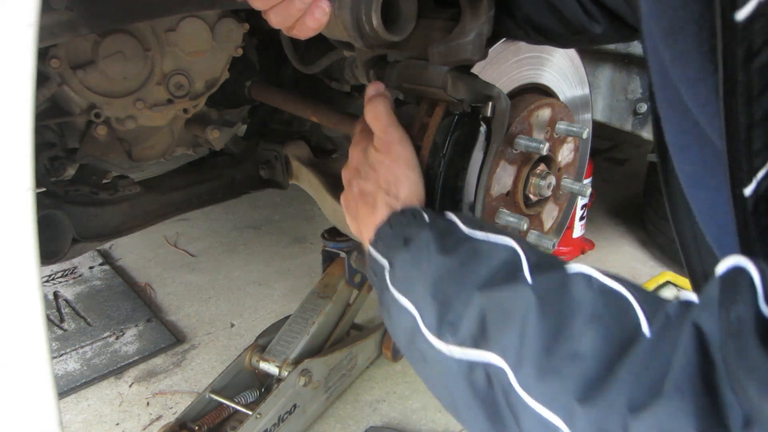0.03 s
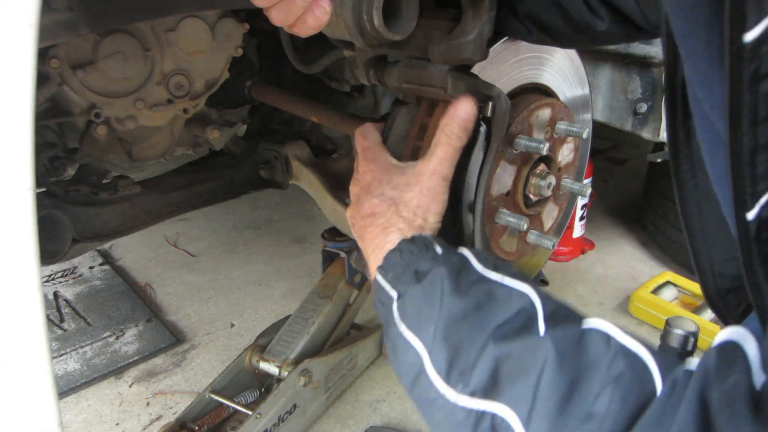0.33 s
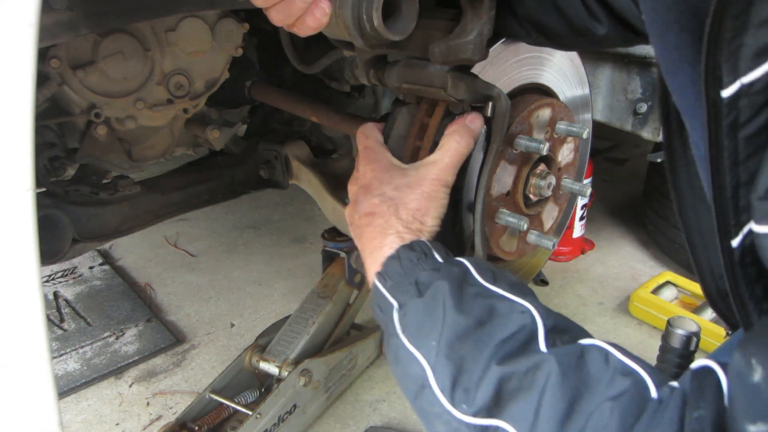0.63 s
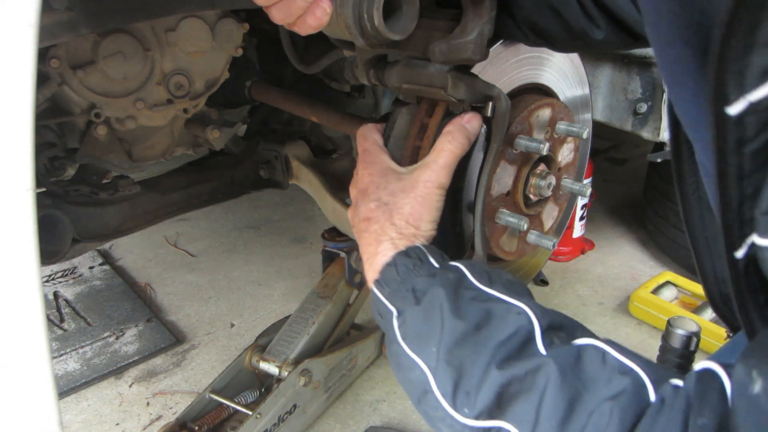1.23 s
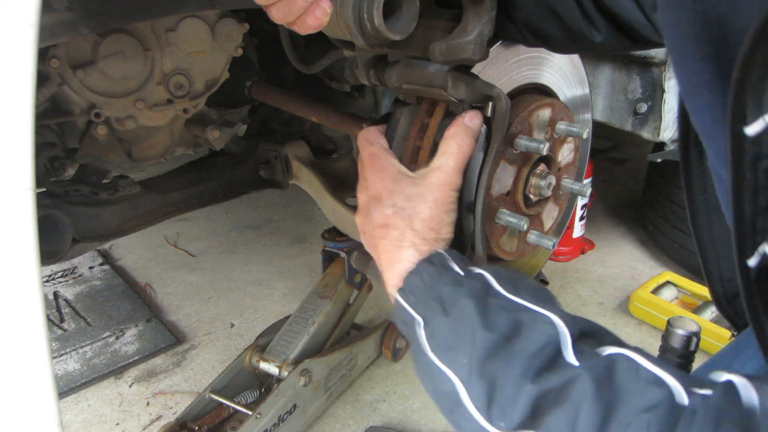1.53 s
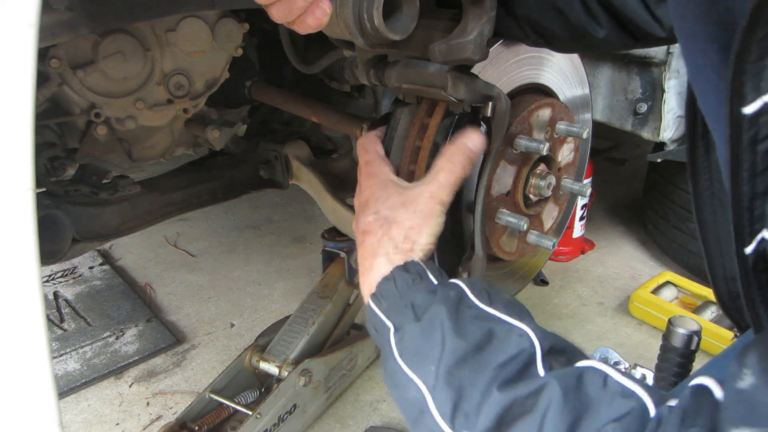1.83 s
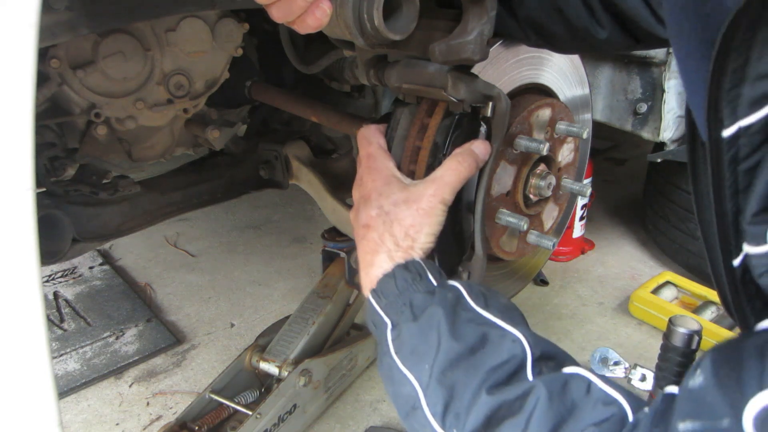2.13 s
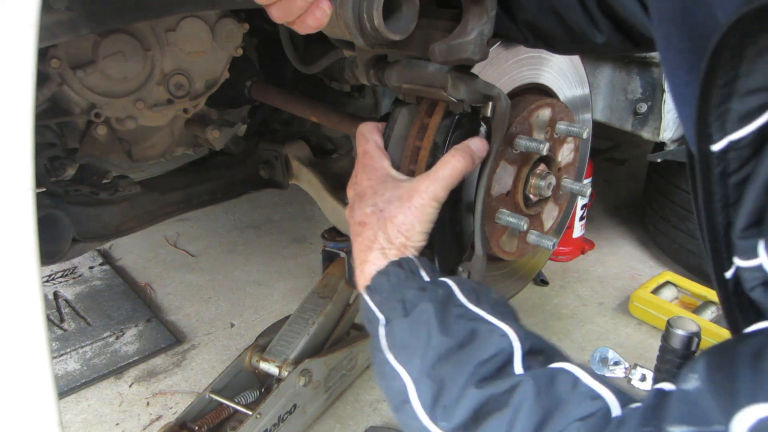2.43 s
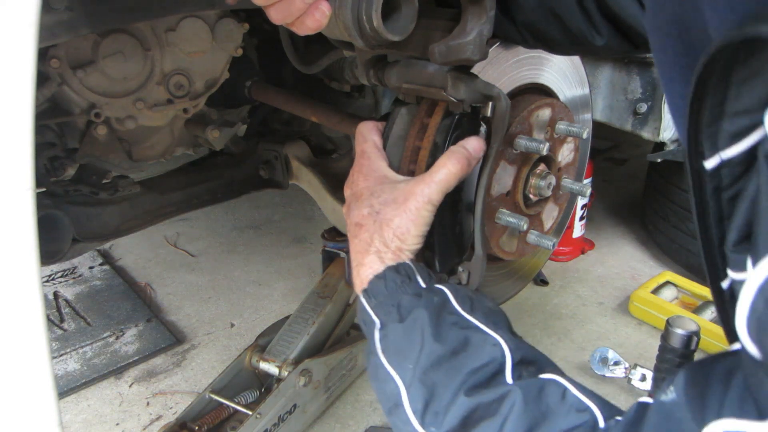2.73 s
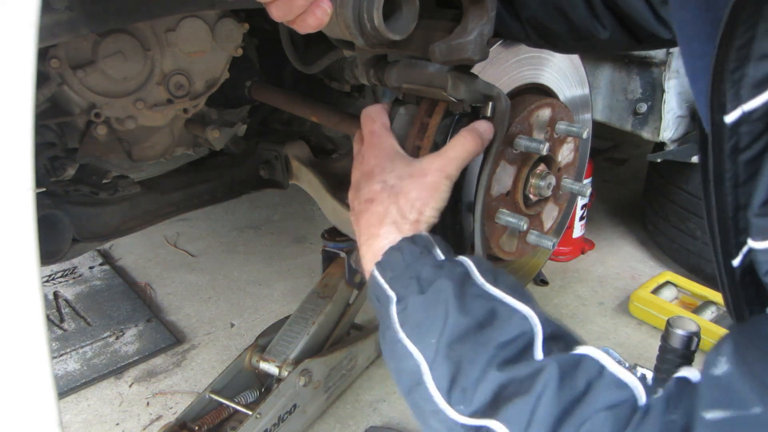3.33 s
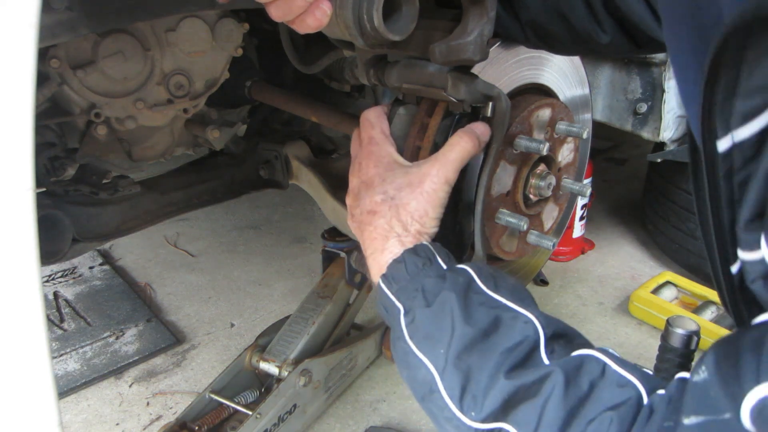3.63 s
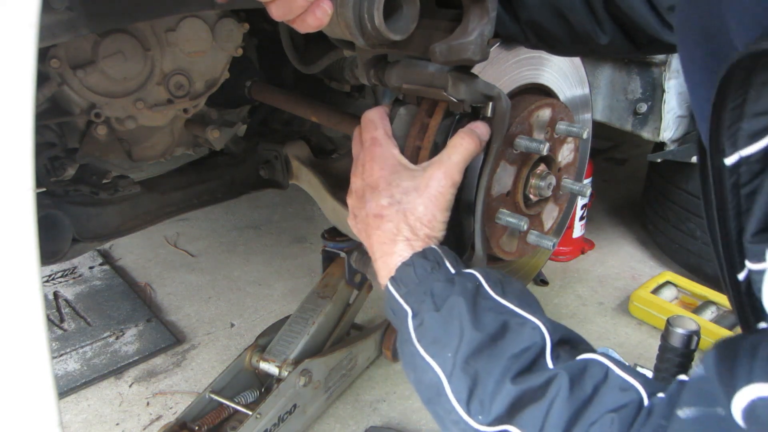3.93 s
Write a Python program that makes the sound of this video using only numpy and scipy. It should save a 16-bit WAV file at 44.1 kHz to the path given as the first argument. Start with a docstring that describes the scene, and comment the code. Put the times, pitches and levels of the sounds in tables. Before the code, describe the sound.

A metal brake caliper is rocked by hand, opening with a scrape, short squeaks and soft bumps. More high squeaks come around 1 second, then a knock just after. Scattered squeaks and bumps follow between 1.6 and 2.5 seconds. Scrapes and thuds return after 3 seconds, with a second knock near 3.5. Throughout, grit ticks faintly and a sleeve rubs on and off over low outdoor rumble.

```python
"""A hand rocks a brake caliper (the clamp that holds the pads) beside a bare wheel hub under a car.
First a pad scrapes, and dry metal sticks and slips in short rising squeaks, with soft bumps.
After about a second the caliper knocks against a stop. Scattered squeaks and bumps follow,
then more scrapes and a second knock near 3.5 s. All along, grit ticks and a sleeve rubs on and off,
and the wheel arch rings briefly over a low outdoor rumble."""
import sys
import numpy as np
from scipy import signal
from scipy.fft import rfft, irfft
from scipy.io import wavfile

SR = 44100
rng = np.random.default_rng(int(sys.argv[2]) if len(sys.argv) > 2 else 0)


def generate_wav(sig):
    """Save sig (samples, or channels by samples) to the path in sys.argv[1] as 16-bit PCM at SR."""
    pcm = np.round(np.clip(np.atleast_2d(sig).T, -1, 1) * 32767).astype(np.int16)
    wavfile.write(sys.argv[1], SR, pcm)


N = 176400


def squeaks():
    """Dry metal sticks and slips so fast that it sings; the pitch rises as the part speeds up."""
    # start_s, length_s, pitch_hz, rise (share of pitch), roughness (0-1), harmonics 1 to 4 (each in dB)
    squeak_events = [ (0.1305, 0.0055, 2820, 0.025, 0.77, -28.5, -48, -27, -56),
                     (0.135, 0.013, 2660, 0.019, .8, -44.5, -69, -64, -76),
                     (0.198, 0.021, 2100, 0.012, 0.3, -63, -53, -56, -63),
                     (0.861, 0.014, 2260, 0.017, .3, -60, -55, -71, -80),
                     (0.866, 0.03, 5340, 0.053, 0.77, -46, -53, -85, -90),
                     (0.971, 0.029, 2294, 0.027, 0.3, -56, -52, -57, -63),
                     (1.005, 0.011, 3292, 0.011, 0.25, -26, -36, -43.5, -57),
                     (1.015, 0.0077, 3405, 0.021, 0.53, -32.5, -33.5, -37, -49),
                     (1.599, 0.017, 5440, 0.0037, 0.32, -34.5, -31, -70, -90),
                     (1.612, 0.012, 5720, 0.017, 0.35, -29, -51, -75, -90),
                     (1.812, 0.0082, 3350, .02, .3, -75, -57, -57, -80),
                     (2.473, 0.0306, 3306, 0.0324, 0.13, -33.5, -40, -46, -62),
                     (2.497, 0.031, 3458, 0.0043, 0.14, -43.5, -44, -54, -64),
                     (3.18, 0.0039, 2300, 0.011, 0.5, -33.5, -34.5, -29, -26),
                     (3.184, 0.013, 2414, .01, 0.65, -42.5, -59, -52, -46),
                     (3.45, 0.0099, 4390, .01, 0.5, -56, -43.5, -75, -88), ]
    attack_s, release_s = 0.0096, 0.0098
    out, t = np.zeros(N), np.arange(N // 32) / SR
    for start, length, hz, rise, rough, *harmonics_db in squeak_events:
        speed = 1 - (1 - np.minimum(t / length, 1)) ** 1.37
        pitch = hz * (1 + rise * speed) * (1 + 0.045 * rough * wander(len(t), hz=900))
        phase = 2 * np.pi * np.cumsum(pitch) / SR
        tone = sum(gain(db) * np.sin(k * phase)
                   for k, db in enumerate(harmonics_db, 1) if k * hz < SR / 2)
        hiss = tone.std() * rough * gain(-10) * band_noise(len(t), hz=6500, width=2.3)
        flutter = gain(2.5 * rough * wander(len(t), hz=240))
        envelope = np.minimum(t / attack_s, 1) * np.clip((length - t) / release_s + .5, 0, 1)
        add(out, start, envelope * (tone * flutter + hiss))
    return out


def knocks():
    """The caliper clacks on a stop, rings, rattles nearby parts and drops back with a duller blow."""
    # Hits: start_s, level_db, clack_hz, clack_db, brightness_hz, rebound_delay_s, rebound_db
    hits = [(1.1487, -23, 1400, 3.5, 1780, .018, -23), (3.4528, -25, 1040, 4.5, 1620, 0.0166, -8)]
    # The notes the caliper rings with: pitch_hz, level_db, fade_s (time to fall 60 dB)
    caliper_notes = [(329.5, -14.5, 0.18), (453.6, -8, .13), (656, -17.5, 0.097), (848, -6, 0.08),
                     (1020, -45, 0.028), (1076, -11, 0.17), (1133, 0, 0.042), (1356, -7.5, 0.047),
                     (1500, -1.5, 0.019), (2520, -20, 0.12), (2900, -17, 0.07)]
    # Tone of the rattling parts: frequency_hz, relative_db
    rattle_shape = [(100, -24), (300, 10.5), (600, 12.5), (1200, 6), (1600, -14), (2200, -5), (4000, -3),
                    (9000, 14), (15000, -7)]
    contact_s, build_cycles = .0006, 4.3
    out, t = np.zeros(N), np.arange(N // 10) / SR
    push = np.sin(np.pi / 2 * np.minimum(t / contact_s, 1)) ** 2
    for start, db, clack_hz, clack_db, brightness_hz, delay, rebound_db in hits:
        ring = sum(fade(t, note_db, fade_s) * sine(t, hz) * np.minimum(t * hz / build_cycles, 1)
                   for hz, note_db, fade_s in caliper_notes)
        rattle = colour(rng.standard_normal(len(t)), rattle_shape) * fade(t, db=0.5, fade_s=0.18)
        clack = sine(t, clack_hz) * fade(t, clack_db, fade_s=0.014)
        add(out, start, gain(db) * soften(push * (rattle + ring + clack), brightness_hz))
        add(out, start + delay, gain(db + rebound_db) * soften(push * ring, hz=800))
    return out


def bumps():
    """The loose caliper thuds softly in its rubber boots as the slack runs out."""
    # Thuds: start_s, level_db, pitch_hz, fade_s
    thuds = [(0.1238, -21.5, 320, 0.015), (.134, -40, 280, 0.17), (0.156, -37, 211, 0.098),
             (1.853, -39.5, 296, .16), (2.460, -35, 267, 0.11), (3.1997, -37.5, 595, 0.099),
             (3.207, -31.5, 295, 0.11), (3.295, -42, 334, 0.19), (3.363, -45, 380, 0.16)]
    attack_s = 0.0013
    out, t = np.zeros(N), np.arange(N // 10) / SR
    for start, db, hz, fade_s in thuds:
        body = gain(-2) * sine(t, hz) + gain(-4) * band_noise(len(t), hz, width=1.03)
        add(out, start, body * np.minimum(t / attack_s, 1) * fade(t, db, fade_s))
    return out


def ticks():
    """Rust and grit snap between the sliding faces."""
    # Snaps: start_s, level_db, pitch_hz, fade_s
    snaps = [(0.636, -53.5, 7250, 0.047), (0.7136, -54, 5560, 0.0075), (1.352, -60, 7000, 0.011),
             (1.575, -58, 5000, 0.015), (1.582, -51.5, 4900, 0.041), (1.7561, -51, 5560, 0.011),
             (2.111, -52, 13000, .035), (2.574, -54, 7800, 0.019), (3.2264, -41, 6000, .018),
             (3.262, -49, 4500, 0.011), (3.298, -53, 2740, .06), (3.317, -59, 2640, 0.045),
             (3.453, -39, 6100, 0.037), (3.5064, -49.5, 5300, 0.015), (3.849, -55.5, 5750, 0.011)]
    out, t = np.zeros(N), np.arange(N // 32) / SR
    for start, db, hz, fade_s in snaps:
        add(out, start, band_noise(len(t), hz, width=0.55) * fade(t, db, fade_s))
    return out


def rubbing():
    """A sleeve and hand slide: a fluttering hiss full of tiny catches."""
    # How loud the rubbing is: time_s, level_db
    rub_levels = [(0, -61), (.09, -50), (.15, -57), (.185, -46), (.225, -49.5), (.27, -56.5), (.42, -55.5),
                  (.62, -56), (.7, -58.5), (.85, -59.5), (1.1, -87), (1.3, -58), (1.42, -86), (1.55, -64.5),
                  (1.61, -49), (1.72, -72.5), (1.88, -53.5), (2.1, -60), (2.35, -74), (2.8, -63),
                  (2.91, -58), (3.03, -61.5), (3.1, -51.5), (3.19, -55.5), (3.25, -52.5), (3.33, -52),
                  (3.39, -53), (3.44, -62), (3.6, -63), (3.75, -64), (4, -65)]
    # Tone of the rubbing: frequency_hz, relative_db
    rub_shape = [(100, 15), (300, 7), (1000, 9), (1600, 3.5), (2500, -2.5), (3500, -8.5), (6500, -7),
                 (9500, -13.5), (11500, -15), (13500, -17), (16000, -23)]
    catches_per_s = 1100
    catches = (rng.random(N) < catches_per_s / SR) * rng.standard_normal(N)
    catches *= gain(2 * np.minimum(rng.exponential(size=N), 5))  # a few stand out
    hiss = colour(rng.standard_normal(N) + gain(-3) * unit(catches), rub_shape)
    level_db = np.interp(np.arange(N) / SR, *np.array(rub_levels).T)
    return hiss * gain(level_db + 3 * wander(N, hz=37.7))


def scrapes():
    """The pad slides along its rusty bracket, catching unevenly and ringing without a clear note."""
    # Slides: start_s, length_s, level_db
    slides = [(0.069, 0.14, -58), (3.067, 0.068, -58.5), (3.198, .16, -52.5)]
    # Where the pad rings: centre_hz, width (share of centre), relative_db
    pad_bands = [(700, 0.39, 3.5), (2740, 0.21, -1), (4530, 0.17, -8), (6270, .12, -7), (7920, 0.092, -9)]
    out, t = np.zeros(N), np.arange(N // 8) / SR
    for start, length, db in slides:
        body = unit(sum(gain(band_db) * band_noise(len(t), hz, width)
                        for hz, width, band_db in pad_bands))
        stroke = np.sin(np.pi * np.minimum(t / length, 1))
        add(out, start, body * stroke * gain(db + 3.5 * wander(len(t), hz=180)))
    return out


def wheel_arch(x):
    """Sound bounces off the wheel arch and floor: two close echoes and a short, softened tail."""
    # Echoes: delay_s, level_db
    echoes = [(.0043, -22), (.0091, -15.5)]
    build_s = 0.0033
    t = np.arange(N // 10) / SR
    tail = rng.standard_normal(len(t)) * fade(t, db=0, fade_s=0.14) * np.minimum(t / build_s, 1)
    response = gain(-10.5) * soften(tail / np.linalg.norm(tail), hz=8900)
    response[0] += 1  # the direct sound
    for delay, db in echoes:
        response[int(delay * SR)] += gain(db)
    return signal.fftconvolve(x, response)[:N]


def dull(x):
    """Turn down the treble above 10 kHz, with a dip near 12 kHz."""
    # Treble curve: frequency_hz, gain_db
    treble = [(9500, 1.5), (10600, -5.5), (11800, -15.5), (13300, -5), (16000, -21)]
    curve_db = np.interp(np.fft.rfftfreq(N, 1 / SR), *np.array(treble).T)
    return irfft(rfft(x) * gain(curve_db), N)


def background():
    """Low outdoor rumble and air, with a wavering hum."""
    # Tone of the outdoor air: frequency_hz, relative_db
    air_shape = [(15, -45), (25, -5), (93, -1.5), (142, -9.5), (167, -13), (231, -18.5), (264, -20),
                 (301, -21), (326, -18), (462, -23.5), (501, -26.5), (573, -23), (952, -22), (1210, -25.5),
                 (2630, -38), (3440, -46), (6370, -48.5), (9770, -55), (11500, -73.5), (13100, -62.5),
                 (15000, -70.5)]
    # Notes of the hum: pitch_hz, level_db
    hum_notes = [(87, -53.5), (113, -52), (159, -58)]
    out = colour(rng.standard_normal(N), air_shape) * gain(-41 + 0.15 * wander(N, hz=1.7))
    for hz, db in hum_notes:
        level = gain(db + 2.4 * wander(N, hz=6))
        pitch = hz * (1 + 0.0461 * wander(N, hz=11.13))
        out += level * np.sin(2 * np.pi * np.cumsum(pitch) / SR)
    return out


def whine():
    """Electronics give off a faint, steady, very high whine."""
    # Notes of the whine: pitch_hz, level_db
    whine_notes = [(12931, -105), (15703, -88), (15735, -98)]
    return sum(np.sqrt(2) * gain(db) * sine(np.arange(N) / SR, hz) for hz, db in whine_notes)


def gain(db):
    """Turn decibels into a multiplier."""
    return 10 ** (np.asarray(db) / 20)


def fade(t, db, fade_s):
    """A level that starts at db and falls 60 dB in fade_s seconds."""
    return gain(db - 60 * t / fade_s)


def sine(t, hz):
    """A pure tone."""
    return np.sin(2 * np.pi * hz * t)


def unit(x):
    """Scale to an average (rms) level of 1."""
    return x / np.sqrt(np.mean(x ** 2))


def add(out, start, x):
    """Mix a sound in at a time in seconds."""
    i = int(start * SR)
    out[i:i + len(x)] += x[:N - i]


def colour(x, points):
    """Shape a sound's tone by (frequency_hz, relative_db) points, at level 1."""
    hz, db = np.array(points, float).T
    f = np.maximum(np.fft.rfftfreq(len(x), 1 / SR), 1)
    return unit(irfft(rfft(x) * gain(np.interp(np.log(f), np.log(hz), db)), len(x)))


def band_noise(size, hz, width):
    """Noise around one pitch; width is a share of that pitch."""
    f = np.maximum(np.fft.rfftfreq(size, 1 / SR), 1)
    return unit(irfft(rfft(rng.standard_normal(size)) / (1 + ((f / hz - hz / f) / width) ** 2), size))


def wander(size, hz):
    """A smooth random wobble, up to about hz times a second."""
    f = np.fft.rfftfreq(size, 1 / SR)
    return unit(irfft(rfft(rng.standard_normal(size)) * (f > 0) / (1 + (f / hz) ** 4), size))


def soften(x, hz):
    """Muffle everything above hz."""
    return signal.lfilter(*signal.butter(3, hz, fs=SR), x)


def scene():
    """The brake parts in the wheel arch, over the background."""
    brake = squeaks() + knocks() + bumps() + ticks() + rubbing() + scrapes()
    return (dull(wheel_arch(brake)) + background())[None]


def record(dry):
    """Add the whine and cut the very highest treble."""
    top_hz = 15800
    return signal.sosfilt(signal.ellip(10, .2, 70, top_hz, fs=SR, output="sos"), dry + whine())


dry = scene()
out = record(dry)
generate_wav(out)
```